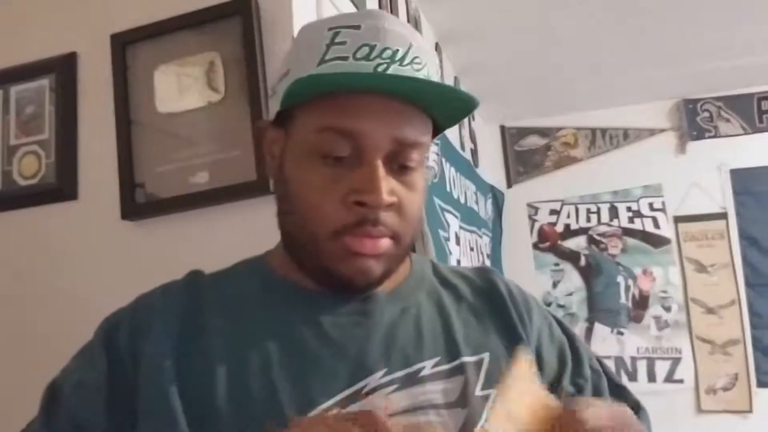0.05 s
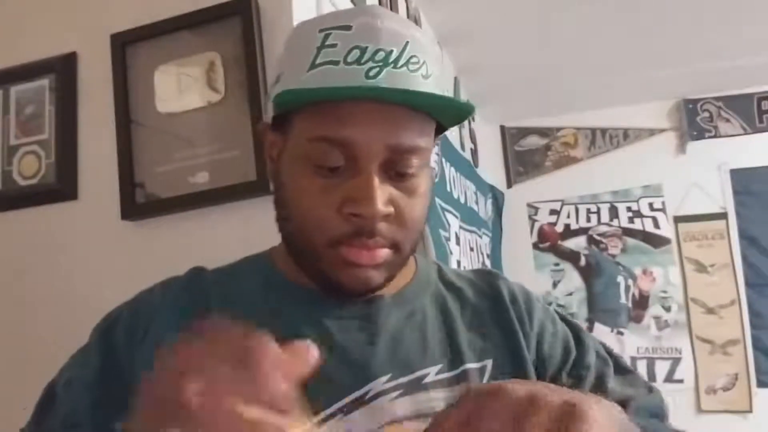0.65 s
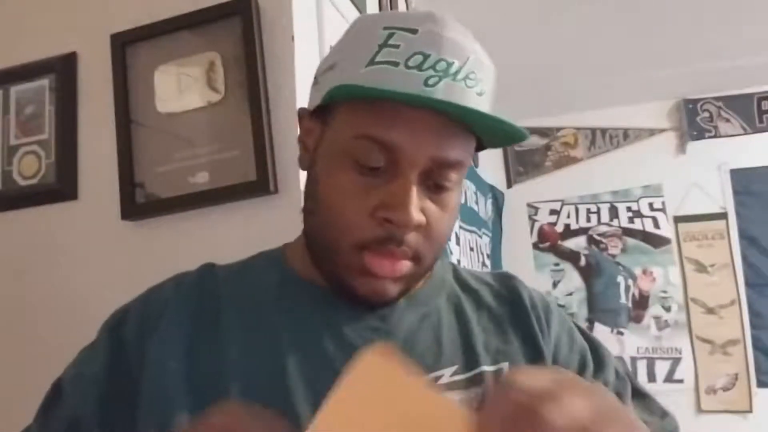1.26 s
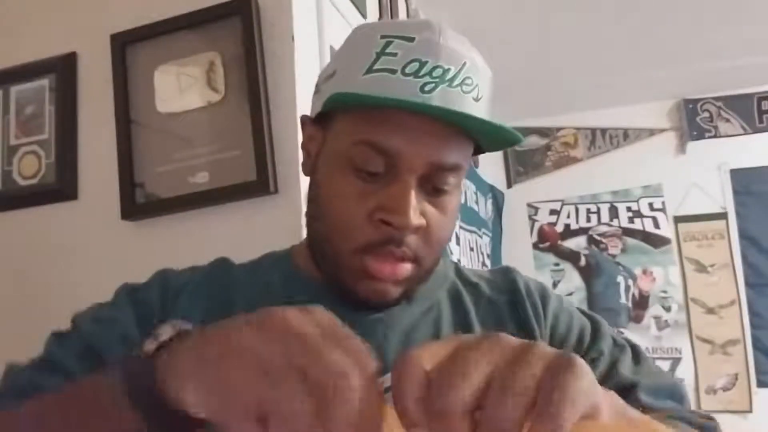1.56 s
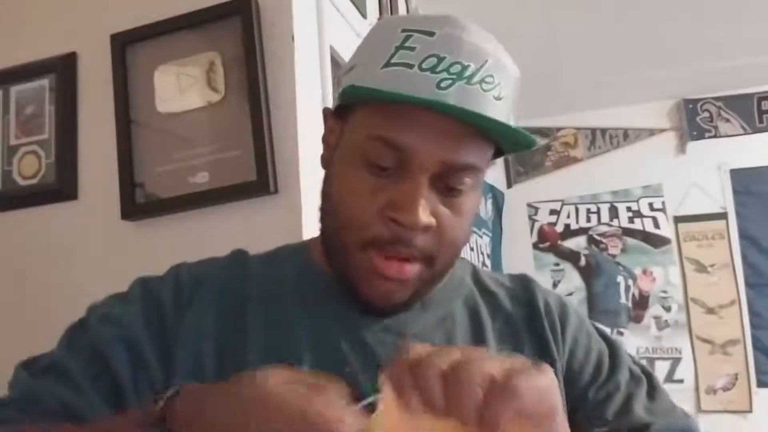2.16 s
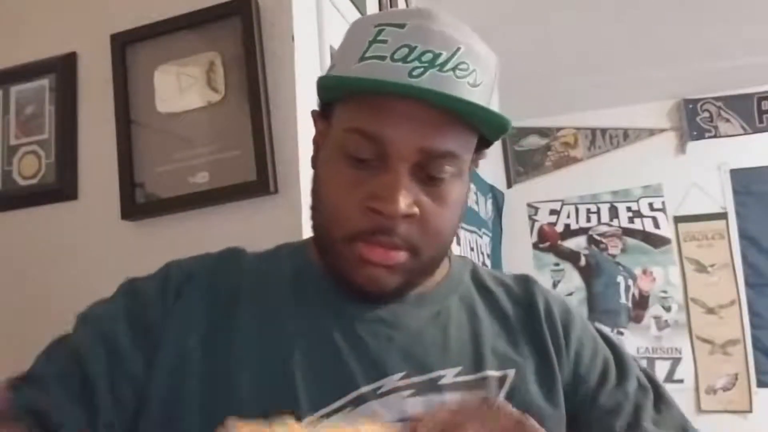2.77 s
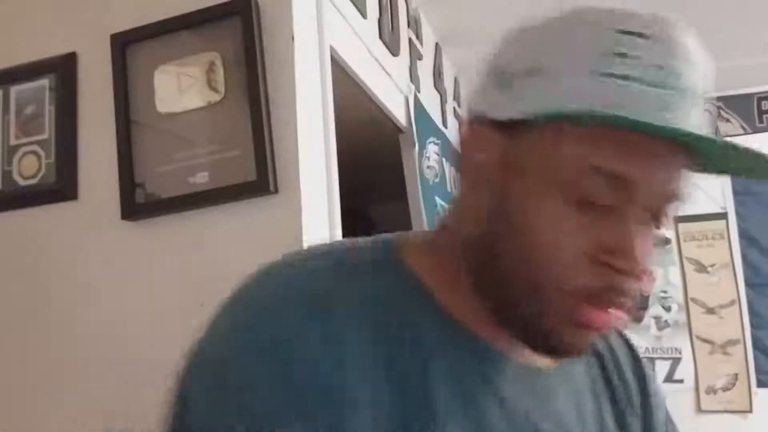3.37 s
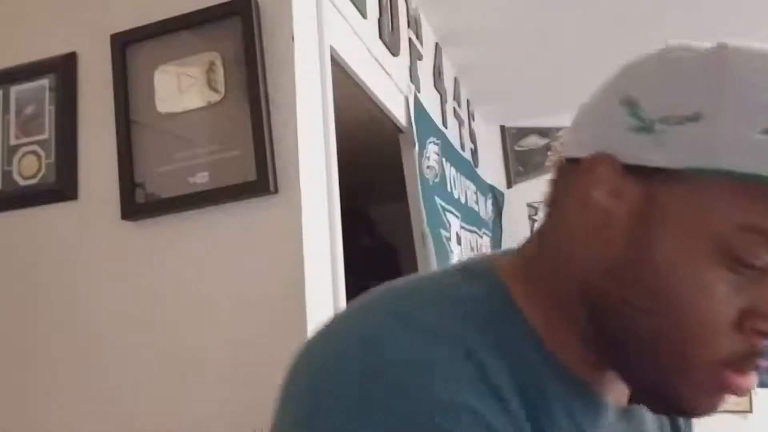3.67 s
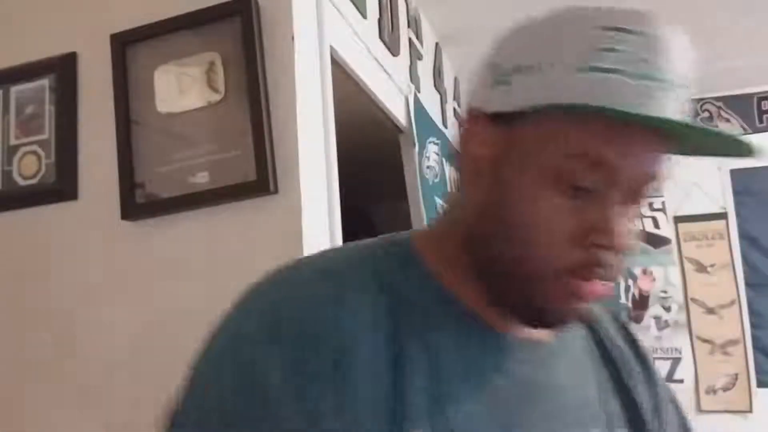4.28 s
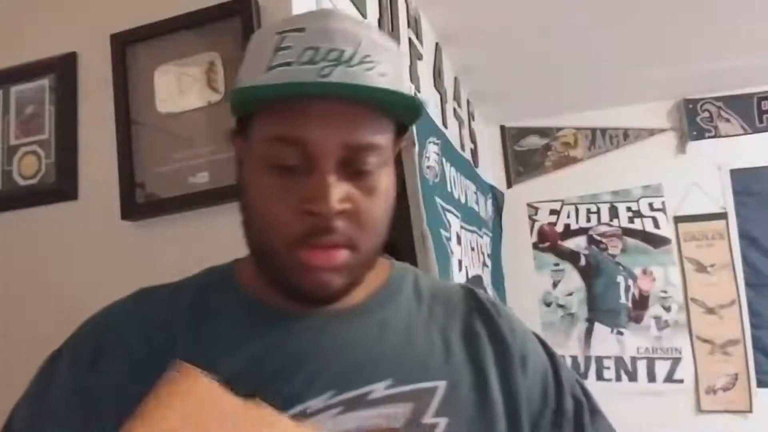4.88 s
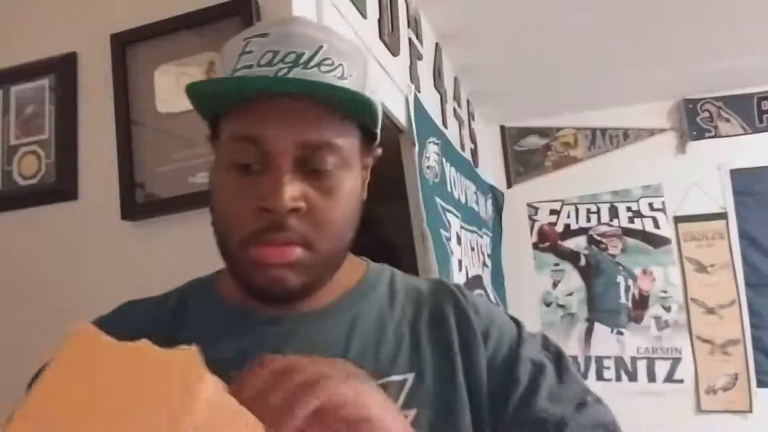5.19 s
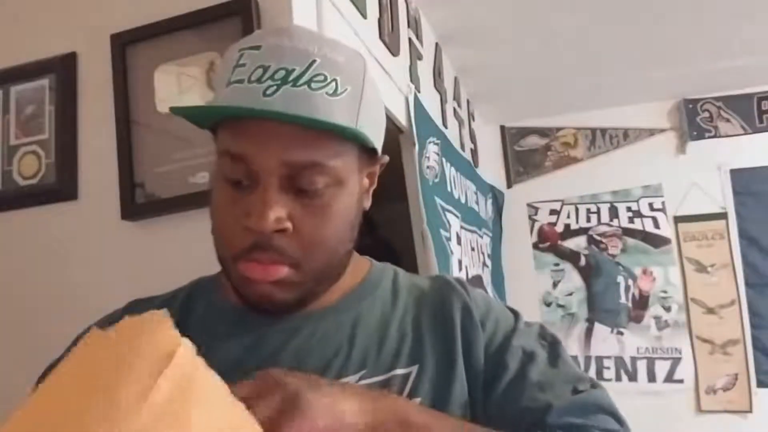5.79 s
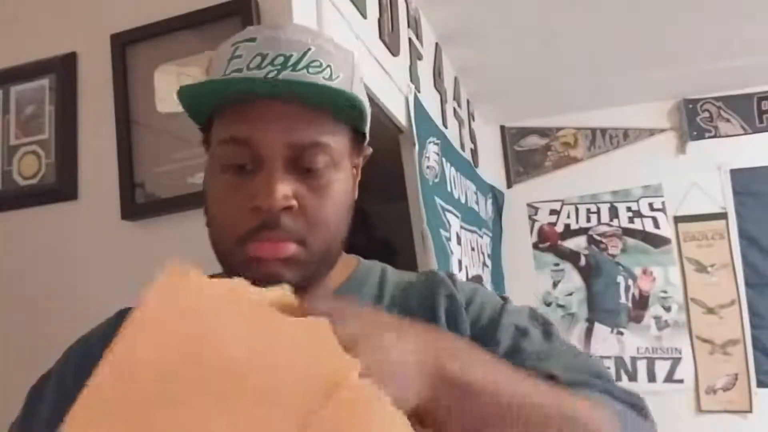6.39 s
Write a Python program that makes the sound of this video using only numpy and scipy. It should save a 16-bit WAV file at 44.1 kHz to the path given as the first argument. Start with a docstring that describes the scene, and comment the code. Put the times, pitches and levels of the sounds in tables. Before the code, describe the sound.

In a small, quiet room, someone opens a padded paper envelope right by the microphone. Light rustles and stiff pops build to a single short tear and a burst of crinkling. The paper goes almost still for a moment, then a faint chair squeak comes with renewed crackling and short, scratchy slides of a hand searching the envelope. The moving body adds a soft, low rumble.

```python
"""Ripping open a padded mailer

A small room, a stereo microphone close to the hands. A padded paper mailer is handled and rummaged in:
its stiff panels buckle in snaps, the hands bend it and slide over it in short strokes, and the flap
tears off in one quick pull. Behind the paper, a chair squeaks faintly as the sitter leans aside,
and the moving body makes a soft rumble."""
import sys
import numpy as np
from scipy import signal
from scipy.fft import rfft, irfft
from scipy.io import wavfile
from scipy.ndimage import uniform_filter1d

SR = 44100
rng = np.random.default_rng(int(sys.argv[2]) if len(sys.argv) > 2 else 0)


def log_audio(samples):
    """Write samples as a 16-bit WAV file to the path given in sys.argv[1]."""
    # one column per channel
    frames = np.atleast_2d(samples).T
    # limit to full scale, then quantise
    limited = np.clip(frames, -1, 1)
    pcm = np.round(limited * 32767).astype(np.int16)
    wavfile.write(sys.argv[1], SR, pcm)


N = 292824
TIME = np.arange(N) / SR


def from_db(db):
    return 10 ** (np.asarray(db) / 20)


def rms_one(x):
    return x / np.sqrt(np.mean(x ** 2) + 1e-20)


def energy_one(x):
    return rms_one(x) / np.sqrt(x.shape[-1])


def decay(t, t60):
    return from_db(-60 * t / t60)


def in_time(rows):
    """Each column of a curve, sample by sample."""
    times, *columns = np.transpose(rows)
    return [np.interp(TIME, times, column) for column in columns]


def during(rows):
    """One while a curve lasts, with soft edges."""
    return uniform_filter1d(1. * ((TIME > rows[0][0]) & (TIME < rows[-1][0])), size=200)


def drift(per_s):
    """A random wander of rms 1."""
    knots = rng.standard_normal(4000)
    return rms_one(np.interp(TIME * per_s, np.arange(len(knots)), knots))


def convolve(x, response):
    return signal.fftconvolve(np.atleast_2d(x), np.atleast_2d(response), axes=-1)[:, :x.shape[-1]]


def butter(x, order, hz, kind):
    return signal.sosfilt(signal.butter(order, hz, kind, fs=SR, output="sos"), x)


def response_of(spectrum, size=4096):
    """Minimum-phase impulse response with the given spectrum."""
    hz, db = np.transpose(spectrum)
    grid = np.maximum(np.arange(size // 2 + 1) * SR / size, 1)
    gain = from_db(np.interp(np.log(grid), np.log(hz), db))
    cepstrum = irfft(np.log(gain))
    cepstrum[1:size // 2] *= 2
    cepstrum[size // 2 + 1:] = 0
    return irfft(np.exp(rfft(cepstrum)))[:size // 2]


def two_ports(common, apart, split_hz=1100):
    """Long waves reach both microphone ports nearly alike, short ones differ."""
    side = butter(apart, 2, split_hz, "high") + 0.13 * apart
    return common + side * np.array([[1], [-1]])


def coloured(pair, spectrum):
    """Stereo excitation through a spectrum; rms 1."""
    return rms_one(convolve(two_ports(*pair), response_of(spectrum)))


def impulses(per_s, spread_db, clumps_per_s):
    """Random impulses of uneven size, in clumps."""
    born = rng.random(N) < per_s * from_db(4 * drift(clumps_per_s)) / SR
    return born * from_db(spread_db * np.minimum(rng.exponential(1, N), 3))


def crackle(spectrum, per_s, spread_db, smooth):
    """Tiny slips over smooth friction."""
    slips = rms_one(impulses(per_s, spread_db, clumps_per_s=60))
    signs = rng.choice([-1, 1], (2, N))
    friction = rng.standard_normal((2, N))
    return coloured(slips * signs + smooth * friction, spectrum)


# Panel, crease and fibre, heard close up: (frequency [Hz], relative level [dB])
PANEL_SPECTRUM = [(25, -31.5), (70, -17), (130, -8), (220, -4), (320, 2), (400, -2), (520, -0.5),
                  (850, -3.5), (1150, -5.5), (2000, -42.5)]
CREASE_SPECTRUM = [(450, -25.5), (750, -7.5), (1000, 0.5), (2000, -4), (3700, -2), (4800, -5.5),
                   (8000, -30.5)]
FIBRE_SPECTRUM = [(2500, -40.5), (3800, 6), (4800, 4), (9000, 2.5), (13000, 1), (16000, -4.5)]
# Snaps right at the microphone: (time [s], decay scale [s], panel pitch [Hz], pop level before trim [dB],
# crease pitch [Hz], crack level [dB], tick level [dB])
SNAPS = [(0.0977, 0.038, 664, -56, 1480, -66.5, -76), (0.1256, 0.041, 710, -48, 1130, -47.5, -66),
         (0.1843, 0.037, 460, -43, 2120, -57, -55), (.257, 0.041, 530, -42, 1710, -42, -59),
         (0.2837, .031, 706, -40.5, 1020, -33, -43.5), (0.3328, 0.085, 647, -43.5, 1750, -34.5, -49),
         (.392, 0.075, 507, -45, 1660, -43, -64), (0.43, 0.052, 490, -44, 1780, -38, -33),
         (0.5714, .023, 645, -47, 1270, -57, -69), (0.6339, 0.028, 590, -47, 2380, -39, -69),
         (0.8337, .021, 327, -51, 2500, -68, -61), (0.8778, .029, 350, -50, 2130, -70, -77),
         (.9405, 0.013, 417, -40, 1280, -44.5, -56), (.9837, .02, 526, -48, 2660, -38.5, -34),
         (.994, 0.019, 580, -39.5, 1990, -33.5, -50), (1.0956, 0.0043, 400, -34, 1100, -42, -62),
         (1.1048, 0.035, 368, -42, 2200, -33.5, -31.5), (1.175, 0.024, 450, -38, 2030, -39, -46),
         (1.191, 0.022, 350, -34.5, 1240, -44, -52), (1.212, 0.02, 473, -35, 1530, -32.5, -56),
         (1.227, .013, 567, -46, 2710, -35, -38), (1.2537, 0.027, 850, -35, 1950, -27.5, -38.5),
         (1.3286, .025, 770, -47, 1250, -42.5, -61), (1.626, 0.085, 528, -31, 2470, -28.5, -43),
         (1.6346, 0.014, 520, -50, 2900, -22, -20.5), (1.6847, 0.035, 725, -36.5, 1180, -32, -56),
         (1.742, .01, 740, -41, 2460, -38.5, -36), (1.7485, 0.013, 342, -35, 1660, -34.5, -41.5),
         (1.818, 0.029, 540, -33.5, 1130, -30.5, -60), (1.8645, 0.014, 563, -39.5, 1220, -41, -62),
         (1.9442, 0.021, 537, -37, 970, -37.5, -60), (1.9644, 0.026, 590, -29.5, 1380, -32, -46),
         (1.994, 0.034, 650, -35, 1620, -34, -24.5), (2.009, 0.056, 650, -35, 2320, -27.5, -27),
         (2.0208, 0.014, 454, -28.5, 1620, -29.5, -30), (2.0654, 0.038, 395, -40, 1970, -38.5, -47),
         (2.1067, .016, 506, -46, 1370, -59, -72), (2.167, 0.0082, 400, -33, 1050, -29.5, -36),
         (2.607, 0.052, 626, -35.5, 1740, -33, -40), (2.6679, .05, 490, -32, 2460, -31, -38),
         (2.6846, .022, 676, -33, 1930, -32, -32), (2.7471, .024, 580, -33.5, 2240, -36, -41),
         (2.776, 0.043, 297, -35.5, 3020, -30, -27), (2.9645, 0.01, 547, -47, 1500, -52.5, -65),
         (3.0036, 0.018, 760, -48.5, 950, -48.5, -73), (3.0161, 0.015, 640, -43.5, 2470, -44, -58),
         (3.055, 0.014, 503, -47.5, 1640, -48, -79), (3.102, 0.012, 796, -48.5, 1850, -46.5, -55),
         (3.3717, .038, 776, -61.5, 1656, -60, -76), (3.5539, .052, 338, -61, 2450, -65, -69.5),
         (3.728, 0.029, 590, -70, 1900, -66.5, -77.5), (4.113, 0.054, 437, -50, 1500, -45, -62),
         (4.184, 0.034, 635, -50, 2170, -40.5, -55.5), (4.6586, .06, 645, -45, 2790, -32.5, -42),
         (4.674, 0.036, 780, -42.5, 2190, -30.5, -29.5), (4.7168, 0.06, 810, -60, 1570, -32, -45),
         (4.7848, 0.2, 340, -41.5, 1534, -40, -55), (4.9375, 0.033, 630, -42.5, 990, -55, -59),
         (5.275, 0.028, 435, -51, 1070, -38.5, -49), (5.302, 0.058, 464, -42.5, 1180, -48, -62),
         (5.3444, 0.06, 557, -43, 1050, -37.5, -62), (5.3603, 0.071, 705, -41, 1170, -33.5, -44),
         (5.3912, 0.017, 576, -39.5, 1210, -42, -46), (5.4889, 0.04, 890, -31.5, 1010, -35, -53),
         (5.521, 0.015, 355, -43, 1230, -38.5, -66), (5.7148, 0.062, 700, -52, 950, -35, -58),
         (5.7248, 0.04, 930, -29.5, 990, -30.5, -52), (5.7399, 0.013, 750, -42, 1410, -29, -43),
         (5.8726, 0.058, 646, -40, 1080, -35.5, -64), (5.8908, 0.016, 400, -46, 1100, -35, -50),
         (5.95, 0.034, 900, -35.5, 1430, -28, -62), (6.0289, 0.051, 330, -38, 1960, -22, -30.5),
         (6.037, 0.08, 284, -35, 1010, -40, -41), (6.122, 0.034, 348, -41, 1110, -57, -55),
         (6.0845, 0.064, 870, -40, 1120, -34, -43), (6.2964, 0.017, 790, -43, 2030, -20, -33.5),
         (6.436, 0.035, 555, -44, 1870, -35.5, -59), (6.4512, 0.044, 370, -60, 1800, -30, -60.5),
         (6.47, 0.019, 597, -33.5, 2040, -22, -28), (6.4772, 0.034, 905, -40, 1410, -23, -45),
         (6.626, 0.05, 526, -44, 1790, -38, -43)]


def snaps(pop_trim_db=-0.5, puff_hz=106.7, puff_t60_s=0.057, puff_db=-18):
    """Paper buckles: a panel pops and shakes the air inside, the crease cracks, fibres tick."""
    out = np.zeros((2, N + SR))
    panel, crease, fibre = map(response_of, (PANEL_SPECTRUM, CREASE_SPECTRUM, FIBRE_SPECTRUM))
    t = TIME[:2600]
    for s, ring_s, panel_hz, pop_db, crease_hz, crack_db, tick_db in SNAPS:
        pop = buckle(t, panel_hz, 0.0078 + 0.5 * ring_s, panel, scatter=0.71, damping=0.86)
        crack = buckle(t, crease_hz, 0.34 * ring_s, crease, scatter=1.8, damping=1.0)
        tick = fibre_tick(t, 0.47 * ring_s, fibre)
        puff = from_db(pop_db + puff_db) * decay(t, puff_t60_s) * np.sin(2 * np.pi * puff_hz * t)
        paper = from_db(pop_db + pop_trim_db) * pop + from_db(crack_db) * crack + from_db(tick_db) * tick
        paper *= np.sqrt(SR / 100)   # unit energy becomes rms 1 over 10 ms
        start = round(s * SR)
        out[:, start:start + len(t)] += paper + puff
    return out[:, :N]


def buckle(t, hz, t60, body, scatter, damping):
    """One fold flips: a damped swing, then a scatter of smaller flexes around the same pitch."""
    tone = np.sin(2 * np.pi * hz * t)
    swing = convolve(tone * decay(t, t60), body)
    kicks = two_ports(*rng.standard_normal((2, len(t)))) * decay(t, 2 * t60)
    flexes = convolve(kicks, tone * np.exp(-np.pi * damping * hz * t))
    return energy_one(energy_one(swing) + scatter * energy_one(convolve(flexes, body)))


def fibre_tick(t, t60, body):
    """A bundle of fibres lets go in one impulse, and a few more follow."""
    followers = energy_one(rng.standard_normal((2, len(t))) * decay(t, t60))
    return energy_one(convolve((t == 0) + 0.99 * followers, body))


# Shaken panels and breaking fibres: (frequency [Hz], relative level [dB])
RASP_SPECTRUM = [(25, -41.5), (80, -17.5), (180, -12), (300, -5.5), (520, 2), (700, -0.5), (870, 1),
                 (1200, -0.5), (1520, -3), (1720, 2.5), (2000, -9.5), (2500, -9), (2900, -24.5),
                 (5000, -29)]
RIP_SPECTRUM = [(1800, -26), (3000, -8.5), (3800, -3.5), (6000, -5.5), (10000, -2.5), (13000, 3.5),
                (16000, -8.5)]
# The flap comes off, close up: (time [s], rasp level [dB], rip level [dB])
TEAR = [(2.19, -50, -44), (2.202, -49, -43.5), (2.206, -37, -23.5), (2.228, -26, -28.5), (2.248, -21, -24),
        (2.272, -19, -17.5), (2.298, -23.5, -20.5), (2.32, -26, -22.5), (2.362, -35.5, -31.5),
        (2.4, -55, -67)]


def tearing(ragged_db=2.8):
    """Glue and fibres give way in a fast run of slips that shake the whole mailer."""
    rasp_db, rip_db = in_time(TEAR)
    shaken = from_db(rasp_db) * crackle(RASP_SPECTRUM, per_s=700, spread_db=0.68, smooth=0.26)
    broken = from_db(rip_db) * crackle(RIP_SPECTRUM, per_s=1500, spread_db=3.4, smooth=0.52)
    catches = from_db(ragged_db * drift(170))   # the seam holds and gives by turns
    return (shaken + broken * catches) * during(TEAR)


# The held mailer rustles faintly between strokes: (time [s], level before trim [dB])
GRIP = [(0, -63.5), (.09, -72), (.25, -61), (.58, -68), (.8, -67), (1.05, -60), (1.55, -57.5),
        (2.02, -58.5), (2.14, -72), (2.4, -58), (2.9, -71), (3.3, -74.5), (3.55, -72.5), (3.85, -81.5),
        (4.1, -65), (4.9, -55), (5.68, -61), (6.64, -52)]


def hand_gains(strokes, trims_db, grip_trims_db, attack_s, sag_db_per_s, release_db_per_s):
    """Strokes swell, slacken and die away over the rustle of the grip; one gain per level column."""
    power = from_db(np.add.outer(grip_trims_db, in_time(GRIP)[0])) ** 2
    for s, length, *levels in strokes:
        t = np.maximum(TIME - s, 0)
        fall_db = sag_db_per_s * t + release_db_per_s * np.clip(t - length, 0, 1)
        shape = np.minimum(t / attack_s, 1) * from_db(-fall_db)
        power += np.outer(from_db(np.add(levels, trims_db)), shape) ** 2
    return np.sqrt(power)


# Hands bend the mailer, levels before trim: (time [s], length [s], flutter [dB], crinkle [dB])
BENDS = [(0, 0.015, -69, -56), (.125, 0.16, -56.5, -55.5), (.26, 0.19, -49.5, -45.5),
         (.44, 0.11, -59.5, -61), (.62, .11, -54.5, -56.5), (.83, 0.16, -71, -61), (.94, 0.071, -47, -48.5),
         (1.03, 0.053, -48, -41), (1.08, 0.031, -36, -46.5), (1.17, 0.081, -44.5, -41.5),
         (1.28, 0.077, -50, -72), (1.4, 0.069, -45.5, -49.5), (1.62, 0.03, -50, -40),
         (1.68, 0.23, -45.5, -48), (1.955, 0.088, -40, -42.5), (2.04, 0.067, -45, -53),
         (2.44, 0.24, -51.5, -49), (2.585, 0.021, -35.5, -33), (2.655, 0.12, -39, -32.5),
         (2.95, 0.028, -56, -59), (3.015, 0.12, -56.5, -58.5), (3.37, 0.26, -74.5, -73),
         (3.88, 0.12, -67, -74), (3.995, 0.11, -59.5, -61), (4.1, 0.14, -50, -51), (4.27, .11, -47.5, -50),
         (4.55, 0.1, -56, -53.5), (4.64, 0.046, -42.5, -34), (4.7, 0.14, -44, -46),
         (4.88, 0.17, -54.5, -43.5), (5.14, 0.13, -54.5, -51), (5.23, 0.094, -42, -50.5),
         (5.355, 0.031, -40.5, -38.5), (5.51, 0.051, -38, -49), (5.715, 0.036, -34.5, -49),
         (5.79, 0.12, -50, -49), (5.87, 0.084, -40.5, -49), (5.95, 0.031, -37, -43.5),
         (6.02, 0.048, -43, -33.5), (6.09, 0.23, -47, -43.5), (6.415, 0.047, -44.5, -42),
         (6.46, 0.018, -31, -36), (6.5, 0.092, -53, -41)]


def bending():
    """Bent paper: a few panel flexes and more small creases."""
    flutter, crinkle = hand_gains(BENDS, trims_db=(-2, -1.12), grip_trims_db=(-1.5, 0.5),
                                  attack_s=0.0089, sag_db_per_s=7, release_db_per_s=350)
    panels = flutter * crackle(PANEL_SPECTRUM, per_s=160, spread_db=0.63, smooth=0.87)
    return panels + crinkle * crumple()


def crumple(ring_cycles=8.8, pitches=12):
    """Small creases flip at random, each ringing briefly at its own pitch, over the sheet's friction."""
    flips = impulses(per_s=200, spread_db=3.5, clumps_per_s=40) * rng.choice([-1, 1], (2, N))
    pitch_index = rng.integers(0, pitches, N)
    rings = 0
    for k, hz in enumerate(np.geomspace(700, 2600, pitches)):
        radius, angle = decay(1 / SR, ring_cycles / hz), 2 * np.pi * hz / SR
        poles = [1, -2 * radius * np.cos(angle), radius ** 2]
        rings += hz * signal.lfilter([0, np.sin(angle)], poles, flips * (pitch_index == k) + 1e-18)
    friction = coloured(rng.standard_normal((2, N)), CREASE_SPECTRUM)
    return rms_one(coloured(rings, CREASE_SPECTRUM) + friction)


# Coarse scratch and fine hiss: (frequency [Hz], relative level [dB])
SCRATCH_SPECTRUM = [(2500, -24.5), (3800, -4.5), (4700, -4.5), (9000, -3.5), (11000, -9.5), (14000, -31)]
HISS_SPECTRUM = [(5000, -27), (8000, -10), (10000, -2.5), (13000, 2.5), (16000, -2.5)]
# Paper slides on paper or skin, levels before trim: (time [s], length [s], scratch [dB], hiss [dB])
SLIDES = [(0, 0.0088, -76, -70), (.13, 0.072, -65, -59), (.32, 0.14, -55, -50), (.44, 0.048, -57, -64),
          (.62, 0.093, -53.5, -47), (.93, 0.056, -53, -45), (.98, 0.085, -46.5, -40.5),
          (1.155, 0.032, -45, -35), (1.21, .11, -51.5, -42.5), (1.4, 0.075, -51.5, -41),
          (1.57, .06, -57, -45.5), (1.62, 0.045, -40.5, -52), (1.72, 0.1, -50, -44), (1.84, 0.18, -73, -66),
          (1.992, 0.018, -30.5, -32.5), (2.166, 0.006, -45, -23.5), (2.18, .025, -43, -39),
          (2.45, 0.097, -49, -45.5), (2.585, 0.08, -44, -38), (2.65, 0.046, -32.5, -25.5),
          (2.71, 0.06, -36.5, -36), (2.94, 0.03, -61, -60), (3.17, 0.053, -62.5, -64.5),
          (3.885, 0.12, -66, -57.5), (3.993, 0.021, -48.5, -35.5), (4.05, 0.064, -57.5, -48.5),
          (4.28, 0.028, -43.5, -39), (4.32, 0.041, -50.5, -46.5), (4.52, .1, -57.5, -50),
          (4.635, 0.084, -42.5, -38.5), (4.73, 0.082, -48, -39.5), (4.83, .24, -46.5, -43.5),
          (5.145, 0.13, -49, -44), (5.3, 0.084, -53, -52), (5.5, .06, -48.5, -42),
          (5.725, 0.024, -46.5, -47), (5.84, 0.23, -51, -48.5), (5.96, 0.17, -42, -40.5),
          (6.14, 0.05, -41, -37.5), (6.23, 0.1, -44.5, -44), (6.41, 0.28, -44, -40)]


def sliding():
    """Sliding paper: dense friction of coarse and fine fibres."""
    scratch, hiss = hand_gains(SLIDES, trims_db=(0, 1), grip_trims_db=(2, 6),
                               attack_s=0.014, sag_db_per_s=5.5, release_db_per_s=331)
    coarse = scratch * crackle(SCRATCH_SPECTRUM, per_s=1700, spread_db=1.1, smooth=0.76)
    fine = hiss * crackle(HISS_SPECTRUM, per_s=2500, spread_db=7, smooth=0.71)
    return coarse + fine


# The chair, faint behind the paper: (time [s], pitch [Hz], level [dB])
SQUEAK = [(4.2, 562, -73), (4.25, 548, -69), (4.32, 513, -60), (4.38, 517, -61), (4.44, 522, -58),
          (4.48, 549, -70), (4.56, 547, -54.5), (4.63, 536, -68)]


def chair_squeak():
    """The chair gives a thin, unsteady tone under the leaning sitter."""
    hz, db = in_time(SQUEAK)
    phase = 2 * np.pi * np.cumsum(hz * (1 + 0.0034 * drift(70))) / SR
    return from_db(db + 2 * drift(40)) * np.sqrt(2) * np.sin(phase) * during(SQUEAK)


# Body and clothes: (frequency [Hz], relative level [dB])
RUMBLE_SPECTRUM = [(15, -20), (30, -4.5), (52, 5), (80, -2), (125, 0.5), (200, -5.5), (400, -46.5)]
# The sitter shifts near the microphone: (time [s], level [dB])
MOVING = [(0, -96), (.8, -78), (.95, -56.5), (1.7, -57.5), (2.1, -66), (2.45, -70), (2.7, -61),
          (3.05, -85.5), (3.45, -85), (3.6, -81.5), (3.85, -73.5), (4, -62), (4.7, -57), (6.05, -57.5),
          (6.64, -54.5)]


def body_rumble():
    """Moving body and clothes make a soft, low noise."""
    return from_db(in_time(MOVING)[0]) * coloured(rng.standard_normal((2, N)), RUMBLE_SPECTRUM)


# The quiet background at the microphone: (frequency [Hz], relative level [dB])
FLOOR_SPECTRUM = [(20, -1), (55, 3.5), (120, -16), (320, 9), (1000, -15), (4000, -24.5), (16000, 5.5)]


def noise_floor(level_db=-74.5):
    """A steady low murmur with a thin hiss on top."""
    return from_db(level_db) * coloured(rng.standard_normal((2, N)), FLOOR_SPECTRUM)


# The small room and the desk ring: (frequency [Hz], t60 [s], level [dB])
ROOM_MODES = [(240, 0.17, -6.5), (325.7, 0.27, -1), (429, 0.3, -12), (490, .25, -9), (533, 0.33, -3.5),
              (683, 0.073, -7.5), (834, 0.086, -2), (1674, 0.13, -7.5)]


def room(x, early_t60_s=0.072, early_db=-4.5, tail_t60_s=0.26, tail_db=-9.5, treble_t60_s=0.1):
    """Desk and chest reflect, a short tail dies first in the treble, and a few modes ring on."""
    t = TIME[:SR // 2]
    early, tail = (two_ports(*rng.standard_normal((2, len(t)))) for _ in range(2))
    early = energy_one(early * (t > .0015) * decay(t, early_t60_s))
    low = butter(tail, 1, 3000, "low")
    tail = low * decay(t, tail_t60_s) + (tail - low) * decay(t, treble_t60_s)
    tail = energy_one(tail * (t > .005))
    reflections = from_db(early_db) * early + from_db(tail_db) * tail
    response = butter(reflections, 1, 550, "high")   # the bass is left to the modes
    for hz, t60, db in ROOM_MODES:
        gain = from_db(db) * 2 * np.log(1000) / (t60 * SR)
        response += gain * np.cos(2 * np.pi * hz * t) * decay(t, t60)
    return x + convolve(x, response)


# Where the hands work in front of the microphone: (time [s], left minus right [dB])
HAND_BALANCE = [(0, -2.5), (.8, -1), (1.25, -0.5), (1.8, -1), (2.3, 0), (2.75, -1.5), (3.1, -1.5),
                (4.3, -0.5), (5.2, -2), (5.7, -3), (6.3, -1)]


def scene(right_lag_s=0.00015):
    """The mailer moves between the ports; the right one hears it a little later."""
    pan = from_db(in_time(HAND_BALANCE)[0] / 2 * np.array([[1], [-1]]))
    left, right = room((snaps() + bending() + sliding() + tearing()) * pan)
    paper = np.array([left, np.interp(TIME - right_lag_s, TIME, right)])
    return paper + body_rumble() + noise_floor() + chair_squeak()


# What the two microphone ports pass: (frequency [Hz], left gain [dB], right gain [dB])
PORTS = [(400, 2.5, 2), (810, 2.5, 2), (1232, -6, -3.5), (1900, 1, 4), (2500, -1, 0), (3550, 2.5, 1),
         (4500, -1, -3), (5760, 3, -1), (7810, 3.5, -6), (8400, -6.5, -7.5), (10800, -1.5, -6),
         (12960, 4.5, -3), (14400, 1.5, -3), (16000, -2, -12.5)]


def record(dry, overload=0.8, cutoff_hz=16000):
    """Each port adds its colour; the sharpest peaks are rounded and the top is cut."""
    ports = np.array([response_of(np.array(PORTS)[:, [0, side]]) for side in (1, 2)])
    heard = overload * np.tanh(convolve(dry, ports) / overload)
    return signal.sosfilt(signal.ellip(12, .1, 80, cutoff_hz, fs=SR, output="sos"), heard)


dry = scene()
out = record(dry)
log_audio(out)
```